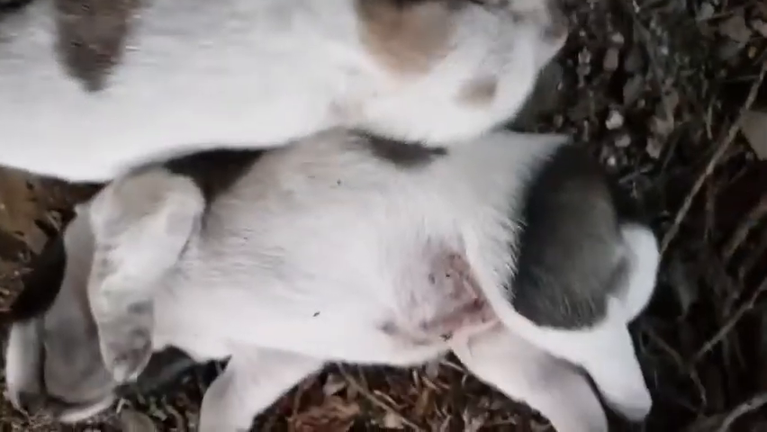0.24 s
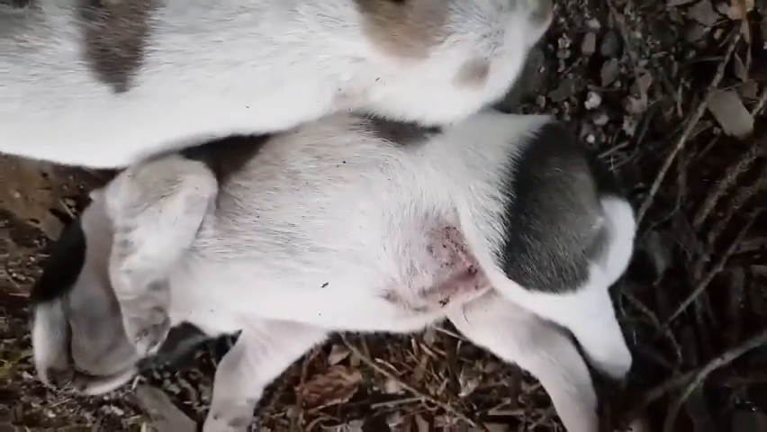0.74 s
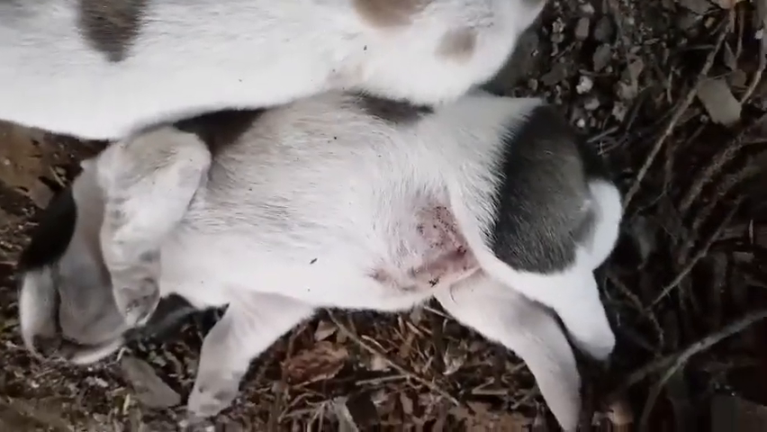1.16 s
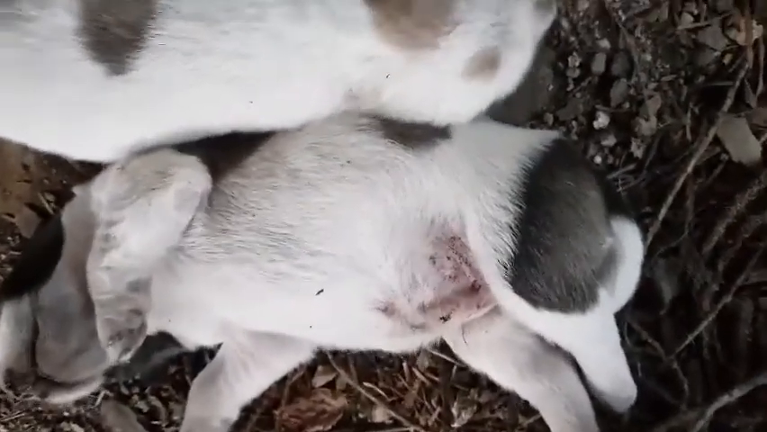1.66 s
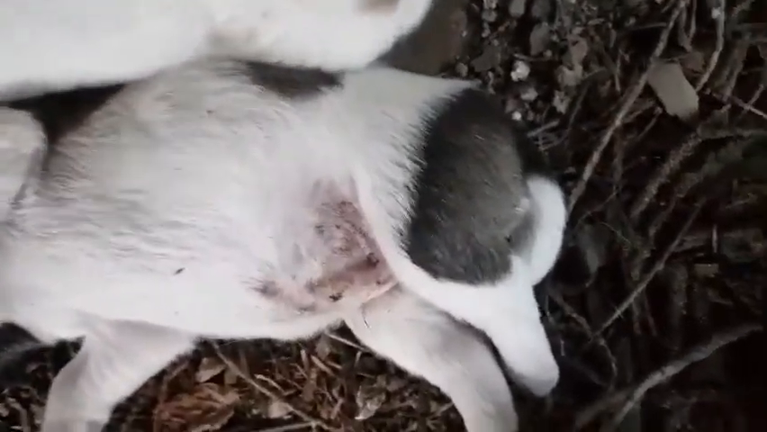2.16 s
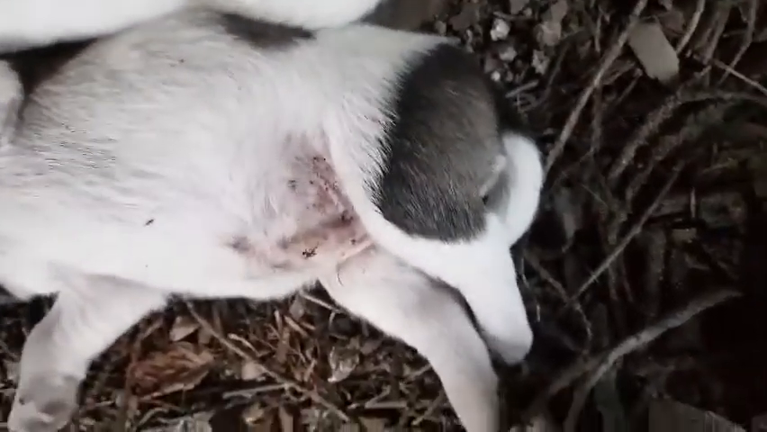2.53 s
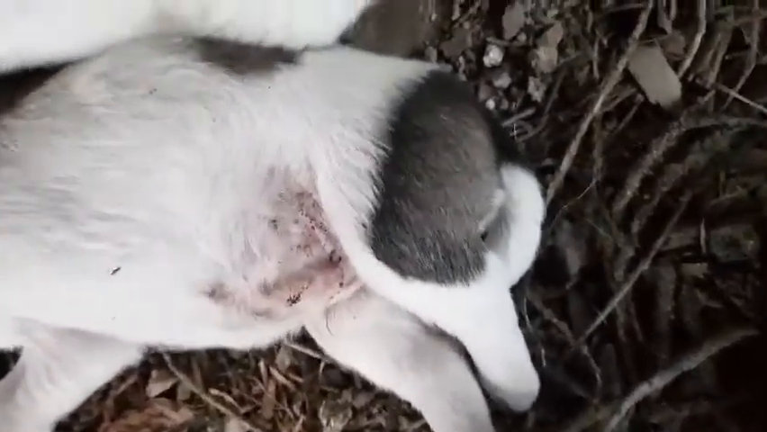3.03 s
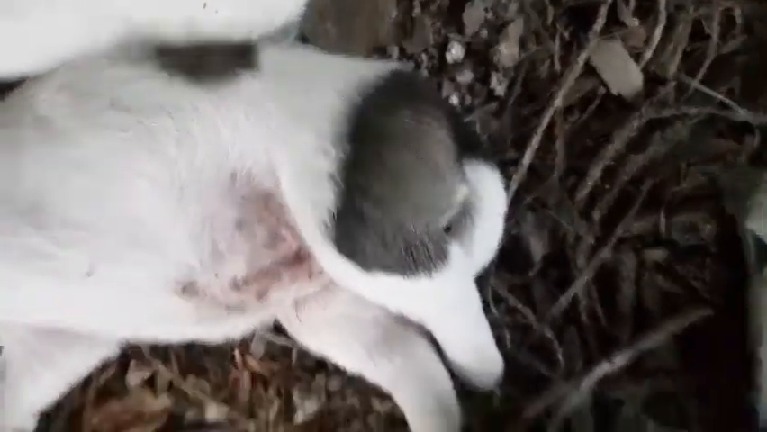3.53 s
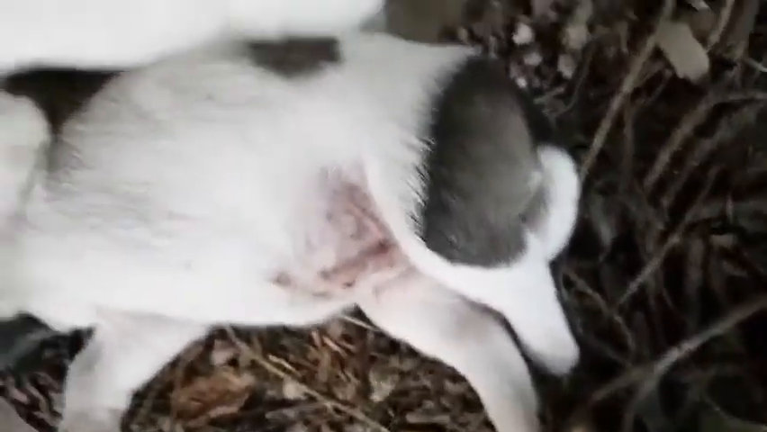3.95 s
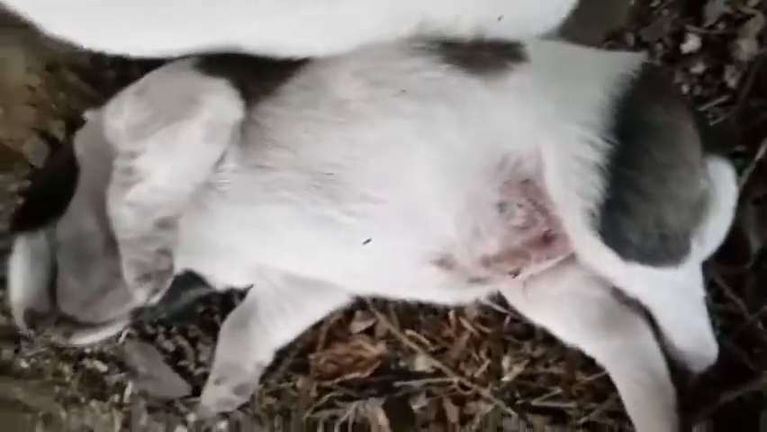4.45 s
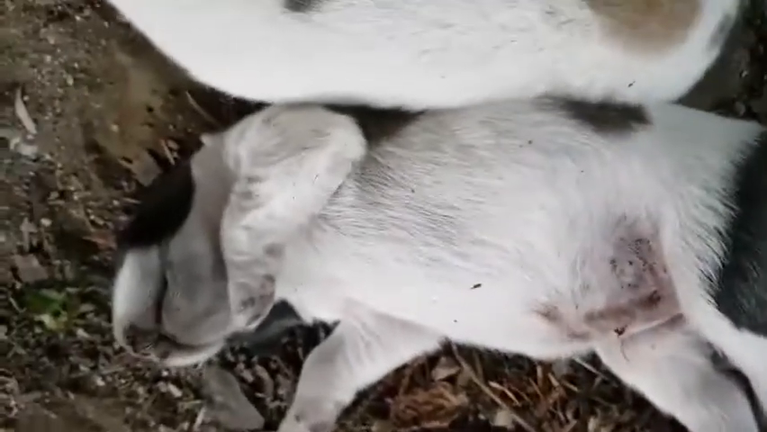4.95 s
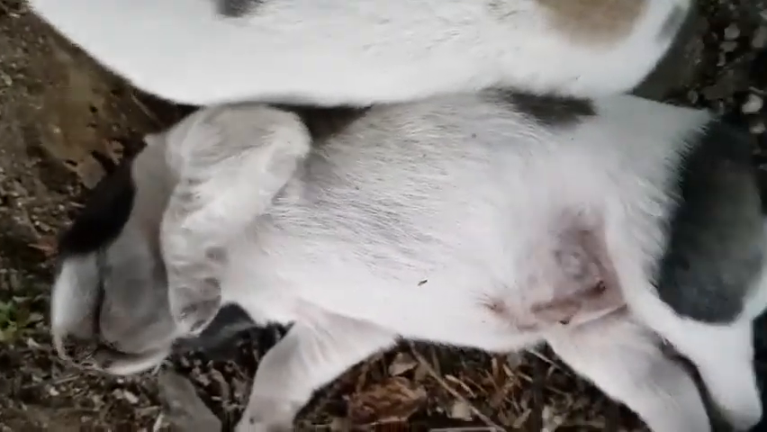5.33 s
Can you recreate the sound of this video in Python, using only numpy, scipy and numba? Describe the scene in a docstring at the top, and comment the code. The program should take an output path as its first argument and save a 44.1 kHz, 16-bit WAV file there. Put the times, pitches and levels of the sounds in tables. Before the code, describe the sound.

Close, dry stereo outdoor sound of a tiny pup crying in uneven bursts. The opening cry is a rough high squeak falling abruptly to a nasal whine; others start creaky, swell and sag. The fourth is loudest, the middle ones low and grumbling, later ones flip up into squeaks. Little breaths, lip clicks and litter rustles come between, with a faint wavering low tone in the second half and soft far rumble and hiss behind.

```python
"""A newborn puppy whimpers nine times on leaf litter close to a phone with two microphone ports: uneven
pulses through moving throat resonances break between a low reedy register, a high squeak and a rough creak.
A hollow ring ends each cry; between cries filtered noise sighs, breathes in and rustles, and litter ticks.
A littermate squeaks farther off in gliding tones, and a faint drone, an unsteady low tone, comes and goes.
Behind it all, bands of noise make the rumble of far traffic, a low hum and an insect's high hiss."""
import sys
import numpy as np
from scipy import signal
from scipy.fft import rfft, irfft, next_fast_len
from scipy.io import wavfile
from scipy.ndimage import uniform_filter1d, map_coordinates
from numba import njit

SR = 44100
rng = np.random.default_rng(int(sys.argv[2]) if len(sys.argv) > 2 else 0)


def ratio(d):
    """dB to gain"""
    e = np.asarray(d, float) / 20
    return 10 ** e


def to_wav(s):
    """Save 16-bit WAV."""
    ch = np.atleast_2d(s).T  # columns
    pcm = np.round(np.clip(ch, -1, 1) * 32767)  # PCM
    wavfile.write(sys.argv[1], SR, pcm.astype(np.int16))


N = 246519

# beat of the vocal folds, one curve per cry, jumping where the register breaks: t/s, f/Hz
BEAT = [
    [(.222, 1077), (.275, 1350), (.315, 1212), (.35, 1368), (.4, 1225), (.459, 1004), (.461, 416),
     (.5, 391.5), (.62, 375)],
    [(.865, 240.4), (.92, 319.4), (.97, 458.6), (1.0, 440.4), (1.06, 448), (1.1, 416), (1.2, 380.5)],
    [(1.425, 1206), (1.46, 1321), (1.52, 1262), (1.549, 1500), (1.551, 469.6), (1.67, 413.5), (1.73, 426),
     (1.8, 397), (1.85, 383.6), (1.91, 413)],
    [(2.125, 384), (2.155, 443.4), (2.175, 513.2), (2.24, 527.8), (2.28, 526), (2.33, 435), (2.35, 404.5),
     (2.437, 319.3)],
    [(2.68, 202.4), (2.79, 417.5), (2.83, 383.8), (2.9, 376.5), (2.95, 336.7), (2.995, 293.3)],
    [(3.278, 260.4), (3.34, 346.8), (3.38, 358.7), (3.44, 344.1), (3.45, 362), (3.5, 342.2), (3.57, 350.3),
     (3.652, 278.6)],
    [(3.872, 297.8), (3.907, 405.4), (3.909, 990), (3.956, 1300), (3.99, 1224), (4.02, 1258), (4.065, 1100),
     (4.085, 928), (4.105, 871), (4.129, 848), (4.131, 348), (4.152, 307)],
    [(4.33, 298), (4.414, 478.6), (4.416, 1062), (4.44, 1202), (4.46, 1233), (4.49, 1172), (4.53, 1202),
     (4.6, 1112), (4.654, 1098), (4.656, 463), (4.708, 445)],
    [(4.98, 350), (5.015, 489), (5.052, 529), (5.054, 626), (5.1, 661), (5.157, 595), (5.159, 480),
     (5.19, 456.8), (5.25, 466.4), (5.34, 432), (5.45, 438.9), (5.5, 370.8)],
]
# where the head lies: t/s, right port lag/ms, left over right/dB,
# gain of the highest treble/dB as the muzzle turns toward the phone
HEAD_PLACE = [(.4, 0.29, 6, -13), (1.05, 0.31, 2.5, -40), (1.698, 0.37, 4.5, -11), (2.3, .42, 3.5, -31),
              (2.85, 0.41, 5, -13), (3.5, 0.47, 6, -2.5), (4.0, 0.37, 8, -1), (4.5, 0.32, 7.5, 7),
              (5.2, 0.3, 6, -20)]
# the throat snaps shut: t/s, level of the ring before its soft onset/dB, f/Hz
SNAPS = [(0.606, -22.5, 1022), (1.184, -23.5, 962), (1.897, -20, 1023), (2.427, -23, 960),
         (2.987, -24, 923), (3.641, -26.5, 747), (4.131, -38, 734), (4.696, -26, 1050), (5.487, -21, 930)]


def unit(x):
    """x at rms 1."""
    return x / np.sqrt(np.mean(x ** 2) + 1e-20)


def along(points, hz):
    """Values between (f/Hz, value) points, on a log frequency axis."""
    f, v = np.transpose(points)
    return np.interp(np.log(hz + 1), np.log(f + 1), v)


def over_time(s, values):
    """One value per sample, joined by straight lines."""
    return np.interp(np.arange(N) / SR, s, values)


def stretches(rows):
    """Values held from one time to another, the largest where they overlap, zero elsewhere."""
    t = np.arange(N) / SR
    return np.max([v * ((t >= a) & (t <= b)) for a, b, v in rows], axis=0)


def curves(tables):
    """One value per sample for each column, then a gate that is open inside the tables."""
    s, *cols = np.transpose(np.concatenate(tables))
    gate = stretches([(rows[0][0], rows[-1][0], 1) for rows in tables])
    return [over_time(s, c) for c in cols] + [uniform_filter1d(gate, size=550)]


def wobble(rate):
    """A smooth random curve, rate knots a second."""
    knots = rng.standard_normal(int(N * rate / SR) + 4)
    return map_coordinates(knots, [np.arange(N) * rate / SR])


def filtered(x, response):
    """x times a response of frequency in Hz."""
    m = next_fast_len(N + 8192)
    return irfft(rfft(x, m) * response(np.fft.rfftfreq(m, 1 / SR)), m)[..., :N]


def shaped(x, spectrum):
    """x coloured by (f/Hz, level/dB) points."""
    return filtered(x, lambda hz: ratio(along(spectrum, hz)))


def rush(spectrum, alike):
    """Stereo noise of rms 1 whose two sides are as alike as the (f/Hz, likeness) points say."""
    def mid_side(hz):
        turn = np.arccos(np.clip(along(alike, hz), -1, 1)) / 2
        return ratio(along(spectrum, hz)) * [np.cos(turn), np.sin(turn)]
    mid, side = filtered(rng.standard_normal((2, N)), mid_side)
    return unit(np.array([mid + side, mid - side]))


@njit
def resonate(x, a, b):
    """A two-pole resonance whose coefficients move."""
    y = np.zeros(len(x))
    for i in range(2, len(x)):
        y[i] = (1 - a[i] - b[i]) * x[i] + a[i] * y[i - 1] + b[i] * y[i - 2]
    return y


def poles(centre_hz, width_hz):
    """Coefficients of a resonance: the wider it is, the faster it dies away."""
    pole = np.exp(-np.pi * width_hz / SR) * np.ones(N)
    return 2 * pole * np.cos(2 * np.pi * centre_hz / SR), -pole ** 2


def steady(x):
    """Gain that holds x at rms 1 from moment to moment."""
    return 1 / np.sqrt(np.abs(uniform_filter1d(x ** 2, size=1300)) + 1e-12)


def ports(x):
    """The sound reaches the right port later and shaded by the phone's body."""
    # shading of the right port: f/Hz, left over right/dB
    shade = [(60, -10.5), (150, -5.5), (380, -1.5), (950, -2), (2380, -2), (5980, 29), (15000, -5)]
    s, lag_ms, pan_db, _ = np.transpose(HEAD_PLACE)
    right = map_coordinates(x, [np.arange(N) - over_time(s, lag_ms) * SR / 1000], order=5)
    right = filtered(right, lambda hz: ratio(-along(shade, hz)))
    return np.array([x, right * ratio(-over_time(s, pan_db))])


def breaks():
    """Irregular beats of the folds: roughness and strong-weak alternation, one value per sample."""
    # time until the folds beat evenly, per cry: t/s
    opening_s = [.001, .055, .05, .032, .04, .067, .036, .085, .02]
    # the voice also breaks inside a cry: from t/s, to t/s, roughness 0-1, alternation 0-1
    inner = [(.228, .255, 0, .24), (.255, .292, .12, .36), (.338, .42, .55, .4), (.42, .475, .3, .25),
             (1.03, 1.1, .03, .12), (1.1, 1.15, .13, .12), (1.455, 1.476, .5, .18), (1.527, 1.55, .55, .28),
             (1.55, 1.62, .4, 0), (1.848, 1.91, .6, 0), (2.2, 2.25, .06, .07), (2.25, 2.262, .5, .07),
             (2.72, 2.81, .35, .11), (2.81, 2.89, .14, .14), (3.578, 3.655, .12, .18),
             (4.655, 4.71, .08, .38), (5.092, 5.104, .4, 0), (5.155, 5.165, .25, 0)]
    # most cries open with a creak, the first almost cleanly; all end in one
    ends = [(rows[0][0], rows[0][0] + s, 0.68) for rows, s in zip(BEAT, opening_s)]
    ends += [(rows[-1][0] - 0.02, rows[-1][0], 0.45) for rows in BEAT]
    rough = stretches(ends + [(a, b, r) for a, b, r, _ in inner])
    rough = rough * np.clip(1 + 0.35 * wobble(45), 0.2, 1.6)  # the rasp comes unevenly
    doubling = stretches([(a, b, d) for a, b, _, d in inner])
    return uniform_filter1d([rough, doubling], size=400)


def folds(pitch_hz, rough, doubling):
    """One pulse per closing of the vocal folds, uneven where the voice creaks, and the phase of the beat."""
    jitter = 0.001992 * wobble(60) + 0.03 * rough * wobble(70)
    phase = np.cumsum(pitch_hz * (1 + jitter)) / SR
    beat = np.arange(2, int(phase[-1]) - 2)
    chance = rng.standard_normal((len(beat), 2))
    at = np.interp(beat, phase, np.arange(N)).astype(int)
    r, d = 0.015 + rough[at], doubling[at]
    shift = np.clip(0.15 * r * chance[:, 0], -0.45, 0.45)  # in beats
    at = np.interp(beat + shift, phase, np.arange(N))
    size = ratio(6 * r * chance[:, 1]) * (1 + d * (-1) ** beat)
    # each pulse is a windowed sinc, so that it can fall between samples
    taps = np.floor(at)[:, None] + np.arange(-7, 9)
    off = taps - at[:, None]
    kernel = np.sinc(off) * np.cos(np.pi * off / 16) ** 2
    where = np.clip(taps, 0, N - 1).astype(int).ravel()
    return np.bincount(where, (size[:, None] * kernel).ravel(), N), phase


def throat(x, mouth, jaw, lips, closing):
    """Three resonances in a row, moved by jaw, mouth and lips, and a nose branch that swallows a band."""
    # resonances: f/Hz with control at 0, f/Hz with control at 1, width/Hz
    resonances = [(660, 1665, 555), (1505, 2432, 314), (2120, 3144, 523)]
    controls = [jaw + 0.1 * (mouth - 0.5), mouth - 0.58 * closing, lips + 0.9 * (mouth - 0.5) - 0.35 * closing]
    centres = []
    for (shut_hz, open_hz, width_hz), control in zip(resonances, controls):
        centres.append(shut_hz + (open_hz - shut_hz) * np.clip(control, -0.5, 1))
        x = resonate(x, *poles(centres[-1], width_hz))
    # the swallowed band drifts between the first two resonances
    nose_hz = centres[0] + (0.36 + 0.12 * wobble(5)) * (centres[1] - centres[0])
    a, b = poles(nose_hz, width_hz=187)
    notched = x - a * np.roll(x, 1) - b * np.roll(x, 2)
    return resonate(notched, *poles(nose_hz, width_hz=1020))


def treble(pulses, puffs, rough):
    """The many small cavities of nose and mouth spread each pulse's treble over a few milliseconds."""
    # upper voice: f/Hz, level/dB
    colour = [(3000, -98), (5000, -15), (6000, -9), (7200, -2), (9000, -1.5), (12500, 6), (14000, -11),
              (15600, -52)]
    t = np.arange(300) / SR
    spread = unit(rng.standard_normal(300) * ratio(-60 * t / 0.072)) / np.sqrt(300)
    near = ports(signal.fftconvolve(pulses + 0.1299 * puffs[0], spread)[:N])
    hiss = 0.25 + 0.6 * rough  # plain air mixed in
    top = shaped(near + hiss * puffs[1:] * ratio([[3], [-3]]), colour)
    s, *_, facing_db = np.transpose(HEAD_PLACE)
    highest = filtered(top, lambda hz: 1 / (1 + (10500 / (hz + 1)) ** 8))
    return top + (ratio(over_time(s, facing_db)) - 1) * highest


def voice():
    """Fold pulses and a little air through the throat, with harsh overtones and a thin hissy treble on top."""
    # one curve per cry: t/s, level/dB, mouth opening 0-1
    cries = [
        [(0.222, -50, 0), (0.23, -43.5, 0.27), (0.288, -36, 0.88), (0.318, -36.5, 0.5), (0.338, -36.5, 1),
         (0.46, -39.5, 0.67), (0.608, -42, 0.46), (0.618, -49, 0.6)],
        [(0.865, -60, 0.55), (0.871, -53, 0), (0.909, -42.5, 0.36), (1.097, -39.5, 0.48), (1.171, -44, 0.28),
         (1.189, -44, 0.57), (1.197, -41, 0.7)],
        [(1.425, -54, 0.55), (1.443, -40.5, 0.11), (1.533, -33, 0.87), (1.627, -36.5, 0.31), (1.707, -36, 0.52),
         (1.901, -38.5, 0.15), (1.91, -41, 0.63)],
        [(2.125, -46, 0.55), (2.139, -37.5, 0.19), (2.191, -23, 0.44), (2.287, -26.5, 0.43),
         (2.359, -37.5, 0.15), (2.399, -36.5, 0.54), (2.425, -41.5, 0.18), (2.437, -54, 0.55)],
        [(2.68, -64, 0.8), (2.694, -43.5, 0.53), (2.792, -36, 0.47), (2.832, -38, 0.48), (2.912, -35, 0.62),
         (2.984, -40, 0.55), (2.995, -57, 0.7)],
        [(3.278, -54, 0.6), (3.282, -47.5, 0.55), (3.314, -39.5, 0.43), (3.538, -32.5, 0.52),
         (3.612, -33.5, 0.46), (3.642, -39, 0.45), (3.652, -50, 1)],
        [(3.872, -56, 0.2), (3.878, -47, 0.25), (3.918, -28, 0.55), (3.94, -31, 0.79), (4.056, -29, 0.68),
         (4.122, -39, 0.42), (4.132, -39, 0.74), (4.152, -66, 0.55)],
        [(4.33, -44, 0.8), (4.34, -46, 0.31), (4.432, -30, 0.72), (4.444, -31, 0.52), (4.56, -30.5, 0.95),
         (4.586, -33.5, 0.43), (4.696, -36.5, 0.7), (4.708, -62, 0.6)],
        [(4.98, -43, 0.05), (4.99, -44, 0.3), (5.016, -35.5, 0.29), (5.138, -32.5, 0.96), (5.186, -37.5, 0.42),
         (5.492, -41, 0.56), (5.5, -45, 0.1)],
    ]
    # how each cry is voiced: jaw 0-1, lips 0-1, low overtones/dB,
    # edge over the voice/dB and treble/dB, both for the start of a cry at the usual level
    manner = [(0.37, 0.54, 0.5, -17.5, -61.5), (0.87, 0.7, 8.5, -18, -61), (0.91, 0.76, 1.7, -15.5, -66.5),
              (0.77, 0.63, -3, -24.5, -60.5), (0.69, 0.13, 9.5, -26, -63.5), (0.36, 0.45, 1.4, -34.5, -61),
              (0.57, 0.29, 0.5, -35.5, -65), (0.65, 0.47, 6.1, -30.5, -62.5), (0.62, 0.67, 0.6, -17.5, -63)]
    # hoarse band of the hardest cries: f/Hz, level/dB
    shrill_colour = [(3000, -93.5), (4300, -1), (5200, 0), (6100, -12), (7500, -59)]
    # harsh overtones of a pressed voice: f/Hz, level/dB
    edge_colour = [(1500, -90), (2500, -20), (3200, 0), (3700, -4), (4300, -24), (5200, -42), (7000, -90)]
    usual_db = -38

    level_db, mouth, gate = curves(cries)
    starts = np.array([rows[0][0] for rows in BEAT])
    cry = np.searchsorted(starts[1:] - 0.05, np.arange(N) / SR)
    jaw, lips, chest_db, edge_db, treble_db = np.transpose(manner)[:, cry]
    rough, doubling = breaks()
    mouth = mouth + 0.05 * wobble(18)  # never quite still
    elapsed = np.arange(N) / SR - starts[cry]
    louder_db = level_db - usual_db
    edge_db = edge_db + louder_db - 22 * elapsed  # the edge sags as a cry runs on
    treble_db = treble_db + 0.74 * louder_db + 6.5 * (mouth - 0.5)  # an open mouth lets treble out
    treble_db = treble_db + 2.5 * rough + 3.3 * wobble(12)  # and a creak hisses more

    pulses, phase = folds(uniform_filter1d(curves(BEAT)[0], size=300), rough, doubling)
    puffs = (1 + 0.08 * np.cos(2 * np.pi * phase)) * rng.standard_normal((3, N))  # air escapes once a cycle
    pulses = pulses * steady(pulses)
    source = pulses + (0.02 + 0.65 * rough) * puffs[0]  # breathier where it creaks
    source = filtered(source, lambda hz: (1j * hz / 600) / (1 + 1j * hz / 600) / (1 + (hz / 3100) ** 8))

    # the mouth closes and darkens each cry's end
    closing = uniform_filter1d(stretches([(s - 0.012, s + 0.03, 1) for s, _, _ in SNAPS]), size=900)
    x = throat(source, mouth, jaw, lips, closing)
    low = filtered(x, lambda hz: 1 / (1 + (hz / 1350) ** 6))
    body = ports(x + (ratio(chest_db) - 1) * low)
    shrill = shaped(ports(pulses + 0.69 * puffs[0]), shrill_colour)
    edge = shaped(ports(pulses + 0.21 * puffs[0]), edge_colour)
    top = treble(pulses, puffs, rough)

    body, edge, shrill, top = (part * steady(part.mean(axis=0)) for part in (body, edge, shrill, top))
    edge = edge + ratio(edge_db + 3.5) * shrill  # the hoarse band grows twice as fast as the edge
    upper = ratio(edge_db) * edge + ratio(treble_db - level_db) * top
    swell = uniform_filter1d(gate, size=700) ** 2  # the upper voice swells in and fades out
    return ratio(level_db) * (gate * body + swell * (1 - 0.36 * closing) * upper)


def gulps():
    """The throat snaps shut: a short hollow ring, a decaying sine with a soft onset, ends each cry."""
    out, t = np.zeros(N + SR), np.arange(2000) / SR
    for s, db, hz in SNAPS:
        swell = ratio(db - 60 * t / 0.032) * (1 - np.exp(-t / 0.00099))
        out[round(s * SR):][:len(t)] += swell * np.sin(2 * np.pi * hz * t)
    return ports(out[:N])


def breath():
    """A sigh fades after each cry and air is drawn in before the next, in lumps, with a rustle of litter."""
    # after each cry: sigh level/dB, its fading/dB per s, level of the intake as it ends/dB,
    # rustle over the air/dB
    pauses = [(-58, 119, -70, -9.5), (-68.5, 27, -89, -2), (-57.5, 48, -88, -4.5), (-64.5, 70, -57, -4),
              (-51, 500, -67, -5.5), (-55.5, 302, -81, -7), (-68, 15, -60.5, -9), (-65.5, 15, -60, -31),
              (-59, 44, -83, -3.5)]
    t, flow = np.arange(N) / SR, np.zeros((2, N))
    ends = [rows[0][0] for rows in BEAT[1:]] + [N / SR]
    for rows, until, (sigh_db, fading, intake_db, rustle_db) in zip(BEAT, ends, pauses):
        since = rows[-1][0]
        sigh = ratio(sigh_db - abs(fading) * np.abs(t - since))
        intake = ratio(intake_db - 166 * np.abs(until - t))  # rises 166 dB per s
        flow += (sigh + intake) * (t > since) * (t < until) * ratio([[0], [rustle_db]])
    low, high = uniform_filter1d(flow, size=550)
    air = rush([(250, 12.5), (500, 6.0), (1200, 9.5), (2200, 6.0), (4000, -17), (6000, -44)], [(1000, 0.68)])
    rustle = rush([(3000, 10.5), (5000, 20), (9000, 8.5), (13500, 14.5), (15500, -4.5)], [(1000, 0.72)])
    return low * ratio(2.5 * wobble(40)) * air + high * ratio(2 * wobble(60)) * rustle * ratio([[2], [-2]])


def ticks():
    """Lips and dry litter click: decaying noise makes a dull knock with a sharp snap."""
    # clicks before colouring: t/s, knock level/dB, snap level/dB
    clicks = [(0.637, -30.5, -76), (1.217, -35.5, -74), (1.291, -40.5, -73), (1.357, -36.5, -74),
              (2.01, -35, -74), (2.045, -38, -74), (2.479, -28, -56.5), (2.586, -34.5, -74.5),
              (2.603, -30.5, -74), (3.214, -67, -56), (3.234, -61, -42.5), (3.549, -42, -58),
              (3.616, -43, -55), (3.709, -52, -59), (4.238, -30, -72), (4.778, -45, -74), (4.795, -42, -74)]
    out, t = np.zeros((2, N + SR)), np.arange(900) / SR
    for s, knock_db, snap_db in clicks:
        burst = rng.standard_normal((2, len(t))) * ratio(-60 * t / [[0.035], [0.008]])
        out[:, round(s * SR):][:, :len(t)] += ratio([[knock_db], [snap_db]]) * burst
    knock, snap = out[:, :N]
    knock = shaped(knock, [(200, -14), (450, 3), (1500, -0.5), (2200, -17.5), (4500, -25), (7000, -50)])
    return ports(knock + shaped(snap, [(2500, -30), (6000, 7), (14000, 11)]))


def littermate():
    """Thin squeaks farther off: faint gliding tones that swell and fade."""
    # squeaks: from t/s, to t/s, f/Hz at start, f/Hz at end, peak level/dB
    squeaks = [(4.246, 4.308, 1730, 1387, -62), (4.84, 4.971, 2224, 2220, -62.5)]
    out = np.zeros(N)
    for a, b, start_hz, end_hz, db in squeaks:
        u = np.linspace(0, 1, round((b - a) * SR))
        phase = 2 * np.pi * np.cumsum(start_hz + (end_hz - start_hz) * u) / SR
        out[round(a * SR):][:len(u)] += ratio(db) * np.sin(np.pi * u) * np.sin(phase)
    return out


def ground(x):
    """Bodies and soil nearby send back a short smear: x through decaying noise."""
    t = np.arange(3000) / SR
    tail = rng.standard_normal((2, len(t))) * ratio(-60 * t / 0.086)
    return signal.fftconvolve(x, tail / np.linalg.norm(tail[0]), axes=1)[:, :N]


def drone():
    """A faint low sine, slightly unsteady in pitch and level."""
    # course of the tone, around which it wavers: t/s, f/Hz, level/dB
    tones = [
        [(3.24, 317, -64), (3.3, 314, -56.5), (3.6, 311, -57), (3.7, 315.3, -67.5), (4.08, 313.5, -62.5)],
        [(4.17, 335.9, -76), (4.26, 337.4, -59.5), (4.7, 334.4, -73), (4.98, 333.7, -60.5)],
    ]
    hz, db, gate = curves(tones)
    tone = np.sin(2 * np.pi * np.cumsum(hz + 3.1 * wobble(9.7)) / SR)
    return gate * np.sqrt(2) * ratio(db + 2.19 * wobble(15)) * tone


def background():
    """Bands of noise: far rumble and hiss, a low hum and an insect high up."""
    # the insect's level, around which it flutters: t/s, level/dB
    insect_level = [(0.0, -86), (0.57, -66.5), (1.48, -80), (1.65, -69), (2.33, -73), (2.44, -74),
                    (3.5, -69), (3.64, -74.5), (5.29, -69.5), (5.59, -72)]
    # level of the low hum: t/s, level/dB
    hum_level = [(0.0, -60), (0.06, -64), (3.07, -57.5), (4.39, -60), (4.5, -53), (4.86, -66),
                 (4.98, -57.5), (5.59, -62.5)]
    # colour of the far rumble and hiss: f/Hz, level/dB
    far_colour = [(15, -27.5), (25, -27), (44, -3), (79, -6), (113, -8), (144, -13), (359, -18.5),
                  (1500, -33.5), (2770, -38.5), (3820, -37), (5570, -34), (6040, -33), (7490, -38.5),
                  (8120, -55.5), (13500, -45), (15500, -53)]
    # left-right likeness of distant sound: f/Hz, likeness 0-1
    likeness = [(60, 0.96), (180, 0.91), (550, 0.27), (1650, 0.42), (4970, 0.076), (15000, 0.043)]
    insect = rush([(6500, -30), (7100, -17.0), (7450, -3), (7800, -7.5), (8500, -58.0)], [(7000, 0.1)])
    insect_db = over_time(*np.transpose(insect_level)) + 1.35 * wobble(50)
    insect = insect * ratio(insect_db) * ratio([[3], [-3]])
    hum = rush([(70, -29), (100, -15), (125, 12.0), (170, -3.0), (260, -27)], likeness)
    hum = hum * ratio(over_time(*np.transpose(hum_level)))
    far_db = -58.5 + 0.29 * wobble(0.72) + 2.3 * wobble(13)
    far = ratio(far_db) * rush(far_colour, likeness) * ratio([[0.4], [-0.4]])
    return hum + far + insect


def scene():
    """All sources at the two ports."""
    pup = voice() + gulps() + ticks() + ports(littermate())
    return pup + ratio(-16) * ground(pup) + breath() + drone() + background()


def low_pass(x):
    """Removes everything above the highest recorded frequency."""
    return signal.sosfilt(signal.butter(12, 15640, fs=SR, output="sos"), x)


def record(dry):
    mix = filtered(dry, lambda hz: 1 / (1 + (hz / 14800) ** 30))
    return low_pass(mix)


dry = scene()
out = record(dry)
to_wav(out)
```